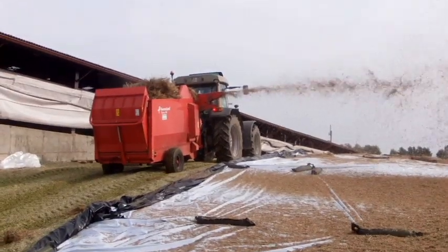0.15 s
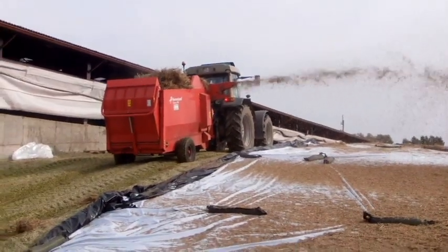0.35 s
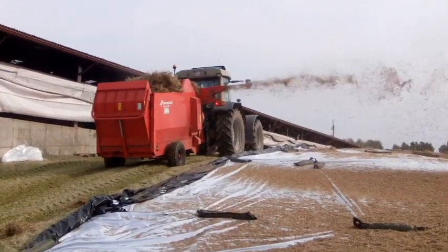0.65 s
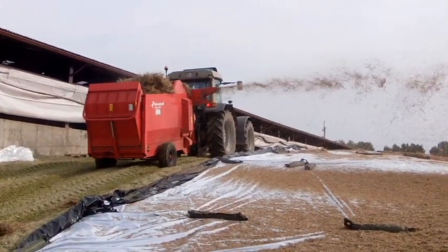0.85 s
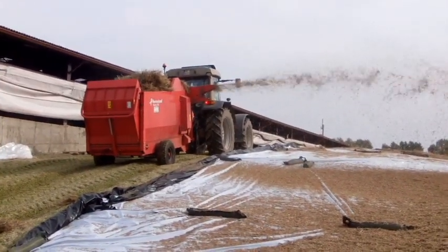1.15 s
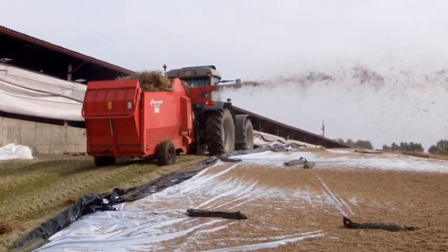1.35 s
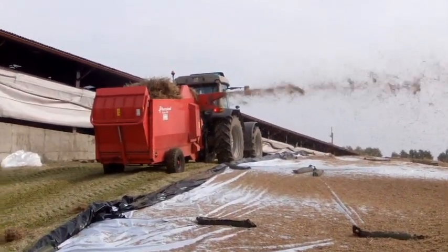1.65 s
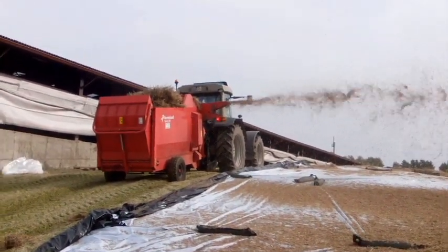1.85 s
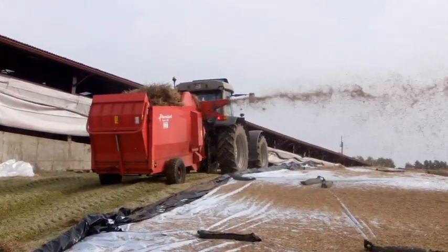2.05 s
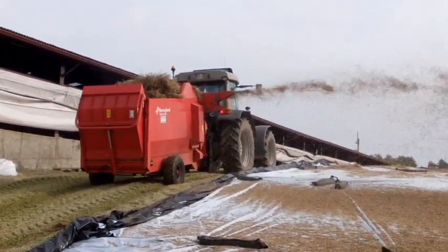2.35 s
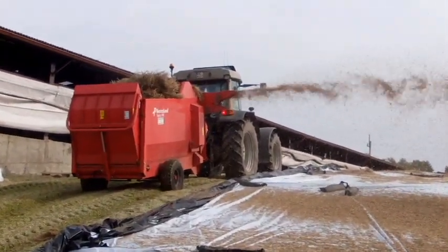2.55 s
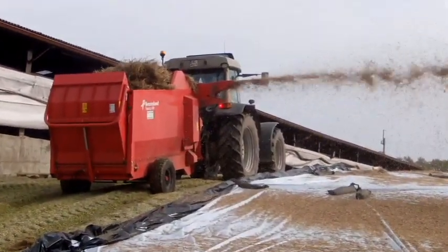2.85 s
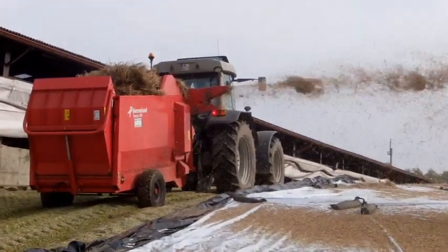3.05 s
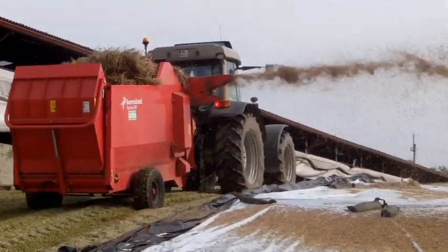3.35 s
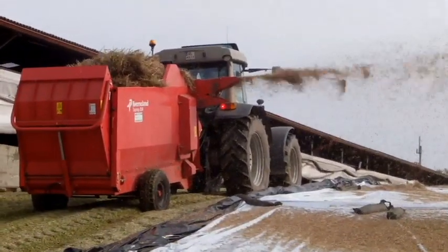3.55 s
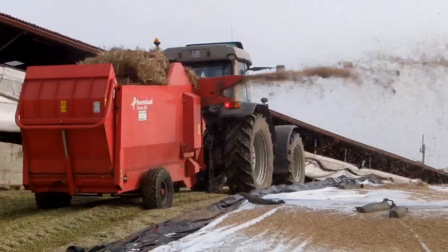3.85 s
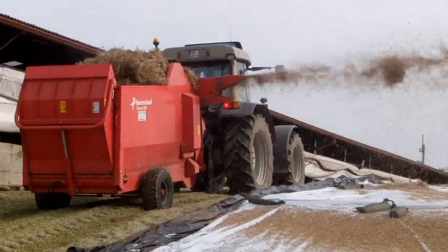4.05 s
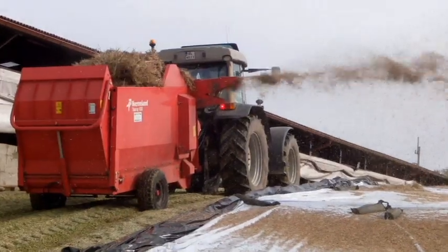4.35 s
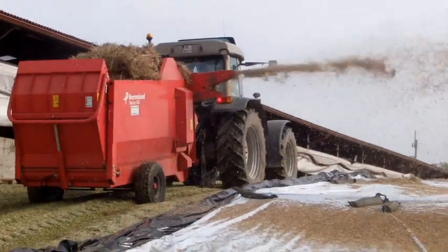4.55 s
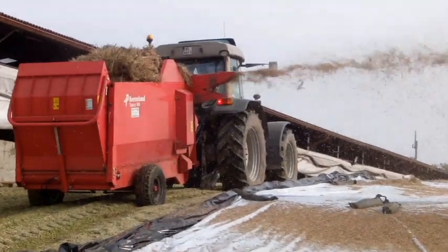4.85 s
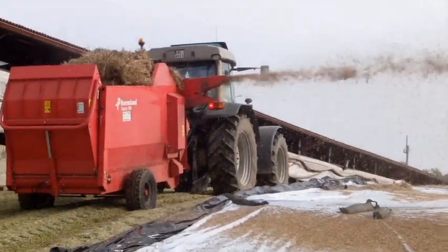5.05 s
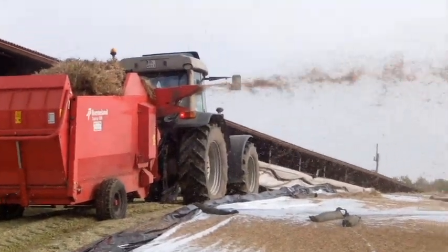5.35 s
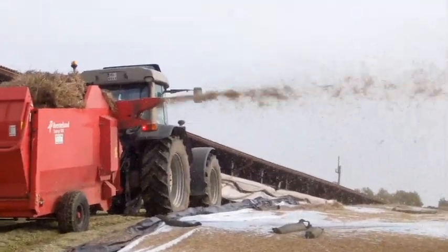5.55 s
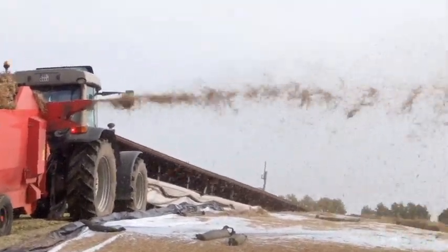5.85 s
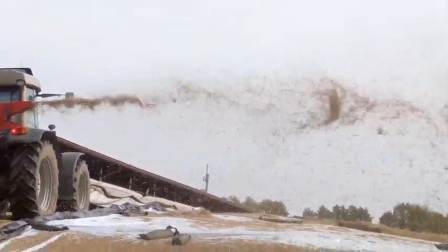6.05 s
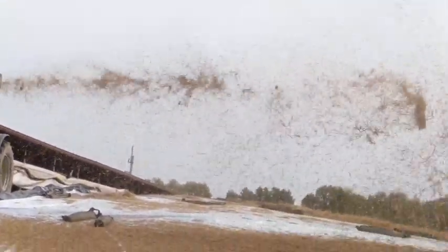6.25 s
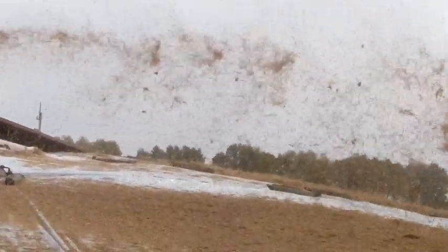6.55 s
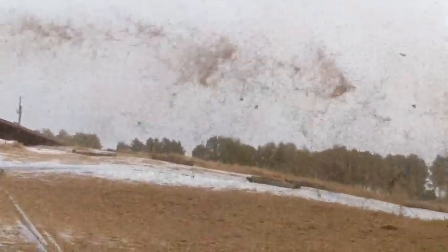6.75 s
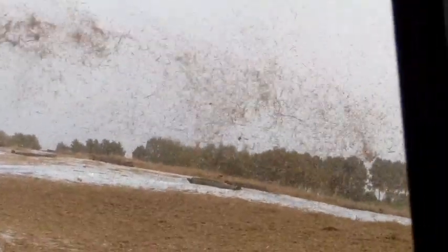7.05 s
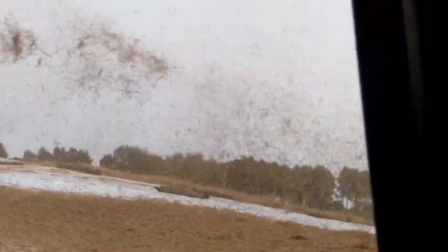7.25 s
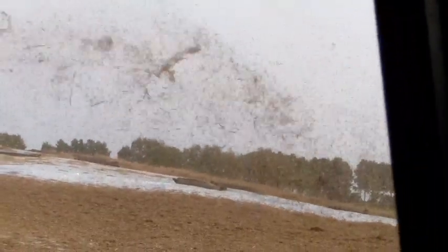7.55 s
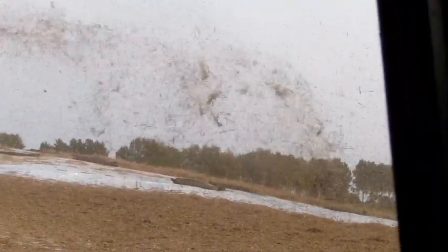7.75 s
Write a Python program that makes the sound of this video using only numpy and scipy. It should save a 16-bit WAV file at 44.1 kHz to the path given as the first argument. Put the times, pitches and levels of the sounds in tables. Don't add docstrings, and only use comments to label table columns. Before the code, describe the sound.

The noise is already at full strength and never stops: a loaded six-cylinder tractor drones low near 46 Hz, with a second engine idling beside the camera and booming unevenly against it. Over them lies a broad blower roar with boxy panel resonances and a bright, dry hiss of straw and grit rattling in a steel chute. Clumps hit as fast raspy swells with rough metallic ring, dying in under a tenth of a second: a flurry from 0.3 to 2.2 s, strong ones near 2.2 and 2.9, more around 4.0 and 5.3, then a dense cluster at 6.5-7.0. Short barn echoes thicken them. A faint turbo whistle flutters near 5 kHz. A distant loader's low revs glide, climbing at 1.6-2.4 and 6.3-7.4 s. From about 6 to 7 s the mono camera microphone turns away, slightly softening whistle, rumble and top treble; the noise continues to the end.

```python
import sys
import numpy as np
from scipy import signal
from scipy.fft import rfft, irfft, next_fast_len
from scipy.io import wavfile
from scipy.ndimage import uniform_filter1d, map_coordinates

SR = 44100
rng = np.random.default_rng(int(sys.argv[2]) if len(sys.argv) > 2 else 0)


def dump(signal):
    limited = np.clip(np.atleast_2d(signal).T, -1, 1)
    pcm = np.round(limited * 32767).astype(np.int16)
    wavfile.write(sys.argv[1], SR, pcm)


def convert_level_to_amplitude(level_db):
    exponent = np.asarray(level_db, float) / 20
    return 10 ** exponent


N = 348390
TIME = np.arange(N) / SR

# time in seconds, crank speed in rev/s, exhaust pipe tone in dB.
TRACTOR_LOAD = [(0.0, 15.61, -29.5), (0.75, 15.46, -32.5), (1.25, 15.51, -32), (2.0, 15.505, -31),
                (2.75, 15.43, -32.3), (3.5, 15.43, -35.5), (3.8, 15.375, -33.5), (4.25, 15.43, -33),
                (4.55, 15.365, -33.3), (5.1, 15.605, -31.2), (5.6, 15.61, -31.5), (6.0, 15.51, -34.2),
                (6.6, 15.595, -30.8), (7.1, 15.58, -36.5), (7.55, 15.59, -32.2), (7.9, 15.55, -32.5)]
# time in seconds, stream level in dB.
STRAW_FLOW = [(0.0, -28), (1.17, -29), (2.46, -29), (2.99, -27.5), (4.05, -29), (4.42, -27.5),
              (4.73, -28.5), (6.36, -29.5), (6.75, -27.5), (7.02, -29.5), (7.9, -30.5)]
# frequency in Hz, level in dB per Hz.
STRAW_SPECTRUM = [(1000, -11.5), (2300, -7), (3200, -3.5), (5000, -1), (6500, -4), (7500, -12),
                  (9500, -15.5), (12000, -21.5), (13500, -26.5), (17000, -37)]

NOTCH_HZ = 7867


def unit(x):
    return x / np.sqrt(np.mean(x ** 2) + 1e-20)


def curves(rows):
    seconds, *columns = np.transpose(rows)
    return [np.interp(TIME, seconds, column) for column in columns]


def sine(cycles):
    return np.sin(2 * np.pi * cycles)


def wobble(rate):
    coarse = np.arange(0, N + 32, 32)
    knots = rng.standard_normal(int(N * rate / SR) + 4)
    return np.interp(np.arange(N), coarse, map_coordinates(knots, [coarse * rate / SR]))


def filtered(x, response):
    size = next_fast_len(N + 8192)
    return irfft(rfft(x, size) * response(np.fft.rfftfreq(size, 1 / SR)), size)[:N]


def coloured(x, spectrum):
    f, db = np.transpose(spectrum)
    return unit(filtered(x, lambda hz: convert_level_to_amplitude(np.interp(np.log(hz + 1), np.log(f), db, -120, -120))))


def patchy(patchy_db):
    z = signal.stft(rng.standard_normal(N + 512), nperseg=512)[2]
    field = uniform_filter1d(rng.standard_normal(z.shape), size=7, axis=0)
    field = uniform_filter1d(field, size=8, axis=1)
    return signal.istft(z * convert_level_to_amplitude(patchy_db * unit(field)), nperseg=512)[1][:N]


def crackle(per_s, spread_db):
    at, size, sign = rng.random((3, int(per_s * N / SR)))
    ticks = np.sign(sign - .5) * convert_level_to_amplitude(spread_db * np.minimum(-np.log(size), 3))
    return unit(np.bincount((at * N).astype(int), ticks, N))


def tones(turns, orders, unsteady_db, slip):
    for order, db in orders:
        drift = slip * np.sqrt(order) * wobble(7) / (2 * np.pi)
        cycles = order * turns + rng.random() + drift
        wave = sine((cycles - np.floor(cycles)).astype(np.float32))
        level = np.sqrt(2) * convert_level_to_amplitude(db + unsteady_db * np.log(1 + order) * wobble(16))
        yield order, level * wave


def dip_or_peak(hz, centre, width):
    return 1 / (1 + (2 * (hz - centre) / width) ** 2)


def split(x):
    top = filtered(x, lambda hz: hz > NOTCH_HZ)
    return unit(x - top), unit(top)


def turned():
    return np.interp(TIME, (5.9, 7.0), [0, 1])


def loader():
    # start in seconds, end in seconds, firing from in Hz, firing to in Hz, level in dB rms.
    revs = [
        (.15, .45, 75.6, 74.6, -23),
        (1.05, 1.396, 76.97, 74.82, -20.5),
        (1.595, 2.45, 55.5, 67.1, -18.5),
        (2.802, 3.5, 72.47, 74.2, -22.5),
        (3.75, 4.198, 73.5, 74.1, -21),
        (4.651, 5.048, 74, 73.6, -23),
        (5.65, 5.9, 65.76, 61.7, -22.5),
        (6.3, 7.452, 68.2, 73.2, -20),
        (7.75, 7.948, 74.5, 76.5, -21),
    ]
    fade_s = .15
    rows = np.array(revs)
    hz = np.interp(TIME, rows[:, :2].ravel(), rows[:, 2:4].ravel())
    level = 0
    for start, end, _, _, db in revs:
        inside_s = np.minimum(TIME - start, end - TIME)
        level = level + convert_level_to_amplitude(db) * np.clip(inside_s / fade_s + 1, 0, 1)
    return np.sqrt(2) * level * convert_level_to_amplitude(1.5 * wobble(8)) * sine(np.cumsum(hz) / SR)


def idler():
    # multiple of crank speed, level in dB rms.
    engine_orders = [(1.0, -42.1), (2.0, -22.7), (3.0, -27.4), (4.0, -19.3), (5.0, -29.0), (6.0, -31.0),
                     (7.0, -41.7), (8.0, -40.0), (11.5, -34.7), (7.25, -36), (16.66, -45)]
    # multiple of crank speed, level in dB rms.
    pump_orders = [(5 / 3, -40), (7 / 3, -34), (8 / 3, -37), (10 / 3, -33), (22 / 3, -45), (46 / 3, -52)]
    rev_s = 13.265 - .0132 * TIME + 0.015 * wobble(0.95)
    boom = convert_level_to_amplitude(1.5 - 0.28 * TIME + 0.56 * wobble(2.54))
    orders = list(engine_orders) + list(pump_orders)
    parts = tones(np.cumsum(rev_s) / SR, orders, unsteady_db=1.0, slip=0.056)
    return sum(tone * (boom if order == 4 else 1) for order, tone in parts)


def turbo():
    rev_s = curves(TRACTOR_LOAD)[0]
    hz = 5080 + 450.6 * (rev_s - 15.5) + 100 * wobble(90)
    level_db = -42.5 - 7 * turned() + 3.0 * wobble(1.2) + 3.5 * wobble(60)
    return np.sqrt(2) * convert_level_to_amplitude(level_db) * sine(np.cumsum(hz) / SR)


def tractor(turns):
    # multiple of crank speed, level in dB rms.
    orders = [(1.5, -37.4), (3.0, -13.6), (6.0, -41.3), (7.5, -38.9), (9.0, -31.5), (10.5, -42.7),
              (12.0, -35.0), (15.0, -42.8), (18.0, -37.6), (21.0, -39.1), (24.0, -55.1), (27.0, -32.6),
              (30.0, -45.4), (33.0, -47.9), (36.0, -46.9), (46.0, -48.8), (65.0, -53.9), (78.0, -52.3),
              (30.66, -48), (61.31, -49), (76.66, -51), (89.25, -51)]
    pipe_db = curves(TRACTOR_LOAD)[1]
    pipe = convert_level_to_amplitude(pipe_db - pipe_db.mean())
    firing = convert_level_to_amplitude(0.63 * wobble(3.91))
    drone = 0
    for order, tone in tones(turns, orders, unsteady_db=0.35, slip=0.039):
        drone = drone + tone * (firing if order < 5 else pipe if order > 20 else 1)
    return drone


def roar(turns):
    # frequency in Hz, level in dB per Hz.
    rumble_spectrum = [(8, -40), (20, -26), (45, -8), (65, -5), (80, -4.5), (100, -19), (155, -13.5),
                       (200, -22.5), (350, -27.5), (500, -56)]
    roar_spectrum = [(150, -39), (300, -5), (500, -2), (1000, -3.5), (1500, -4), (2300, -7), (3500, -15),
                     (6000, -37)]
    stream_db, = curves(STRAW_FLOW)
    roar_db = -29.5 + 0.73 * (stream_db - stream_db.mean())
    puff = 1 + 0.045 * np.cos(2 * np.pi * 3 * turns)
    rumble_db = -24.0 - 2 * turned() + 0.69 * wobble(2.94)
    rumble = convert_level_to_amplitude(rumble_db) * coloured(rng.standard_normal(N), rumble_spectrum)
    air = coloured(patchy(patchy_db=0.45), roar_spectrum)
    return rumble + convert_level_to_amplitude(roar_db + 0.33 * wobble(5) + 0.49 * wobble(12)) * puff * air


def grit():
    # frequency in Hz, level in dB, time to fall 60 dB in seconds.
    modes = [(1682, -0.5, .06), (2039, 0, 0.096), (2835, 0, 0.055), (3245, -1, 0.054), (3800, 3.5, 0.089),
             (4160, -5, .05), (4620, -12, .04), (5410, -5, 0.033), (5620, 2.5, 0.036), (6190, -1, .04),
             (7500, -22, .03)]
    t = np.arange(SR // 10) / SR
    pings = 0
    for hz, db, t60 in modes:
        ring = unit(convert_level_to_amplitude(-60 * t / t60) * sine(hz * t))
        pings = pings + signal.oaconvolve(crackle(per_s=50, spread_db=3), ring)[:N] * convert_level_to_amplitude(db)
    return unit(pings)


def straw(turns):
    stream_db, = curves(STRAW_FLOW)
    throw = 1 + 0.017 * np.cos(2 * np.pi * turns) + 0.06 * np.cos(2 * np.pi * 3 * turns + 2.0)
    rattle = patchy(patchy_db=0.3) + 0.49 * crackle(per_s=3000, spread_db=2.5)
    low, top = split(coloured(rattle, STRAW_SPECTRUM))
    top = top + (convert_level_to_amplitude(-2.5 * turned()) - 1) * filtered(top, lambda hz: hz > 10500)
    stream = low + convert_level_to_amplitude(-14.4 + .7 * wobble(5.5)) * top + convert_level_to_amplitude(-10) * grit()
    return convert_level_to_amplitude(stream_db - 1.27 + 0.88 * wobble(8) + 0.6 * wobble(30)) * throw * stream


def clumps():
    # time in seconds, peak in dB, top end in dB, chute ring in Hz.
    wads = [(0.3207, -18, -25, 3790), (0.635, -15, -25, 5040), (0.801, -16, -16, 5450),
            (0.8602, -14, -24, 5100), (1.2965, -11, -21, 5430), (1.3748, -10.5, -26, 5080),
            (1.6826, -13, -25, 3700), (1.76, -10, -22, 5100), (1.837, -12, -27, 5080),
            (2.0238, -7.5, -24, 3800), (2.2165, -6, -22, 5400), (2.81, -10, -27, 5030),
            (2.8655, -7, -22, 3800), (3.2147, -13, -26, 5190), (3.8382, -21, -26, 5060),
            (4.0178, -8.5, -23, 5450), (4.0402, -13, -20, 5383), (4.3755, -14, -25, 5440),
            (4.969, -14, -27, 2840), (5.1981, -13, -19, 5220), (5.3058, -9, -23, 5700),
            (6.106, -10, -21, 4080), (6.553, -13, -27, 4494), (6.6179, -10, -22, 5276),
            (6.7276, -10, -25, 5860), (6.7456, -7, -20, 5650), (6.757, -15, -23, 5650),
            (6.8214, -10, -26, 4476), (7.0031, -13, -23, 4894), (7.2933, -16, -26, 5064)]
    t60_s, top_t60_s, ring_db = 0.074, 0.048, -5.5
    t = np.arange(SR // 4) / SR
    attack = 1 - np.exp(-t / 0.0029)
    swell, bright, ring = np.zeros((3, N + SR))
    rough = np.pad(wobble(500), (0, SR))
    tufts = [(when * N / SR, -17 + 4 * (size - .5), -22, np.interp(pitch, [0, 1], (4630, 5400)))
             for when, size, pitch in rng.random((24, 3))]
    for s, db, top_db, hz in list(wads) + tufts:
        at = slice(round(s * SR), round(s * SR) + len(t))
        shape = convert_level_to_amplitude(db - 11 - 60 * t / t60_s) * attack
        swell[at] += shape
        bright[at] += convert_level_to_amplitude(db + top_db - 60 * t / top_t60_s) * attack
        rough_ring = (0.37 + rough[at]) * sine(hz * t) * (t < t60_s)
        ring[at] += shape * convert_level_to_amplitude(ring_db + 20 * t / 0.14) * rough_ring
    rattle = rng.standard_normal(N) + 0.24 * crackle(per_s=3000, spread_db=6.0)
    low, top = split(coloured(rattle, STRAW_SPECTRUM))
    wad = swell[:N] * low + bright[:N] * top + ring[:N]
    return wad + convert_level_to_amplitude(-9) * np.roll(wad, round(.010 * SR)) + convert_level_to_amplitude(-12) * np.roll(wad, round(0.02 * SR))


def body(hz):
    # frequency in Hz, width in Hz, lift in dB over the roar.
    panels = [(273, 99, 4.5), (418, 32, 7), (572, 39, 4.5), (710, 38, 0.5), (770, 61, 3.5), (885, 33, 4),
              (959, 52, 6.5), (1180, 17, 2.5), (1420, 58, 3), (1810, 140, 1), (2870, 280, 2),
              (5060, 220, 1.5)]
    # frequency in Hz, width in Hz, depth from 0 to 1.
    dips = [(370, 45, 0.53), (852, 16, 0.67), (1050, 41, 0.27), (1510, 65, 0.34), (2274, 100, 0.4),
            (2630, 78, 0.15)]
    lift = 1 + sum((convert_level_to_amplitude(db) - 1) * dip_or_peak(hz, centre, width) for centre, width, db in panels)
    for centre, width, depth in dips:
        lift = lift * (1 - depth * dip_or_peak(hz, centre, width))
    return lift


def scene():
    turns = np.cumsum(curves(TRACTOR_LOAD)[0]) / SR
    machine = filtered(roar(turns) + straw(turns) + clumps(), body)
    return (loader() + idler() + turbo() + tractor(turns) + machine)[None]


def roll_off(x):
    return signal.sosfilt(signal.butter(12, 15745, fs=SR, output="sos"), x)


def record(dry):
    # frequency in Hz, level in dB per Hz.
    hiss_spectrum = [(3000, -30), (8000, -4), (17000, 5)]
    # Hz under the tone, level in dB rms.
    line_scan = [(0, -66), (60, -77), (120, -77)]
    x = dry[0] / (1 + np.abs(dry[0] / 1.2) ** 6) ** (1 / 6)
    x = x + convert_level_to_amplitude(-56) * coloured(rng.standard_normal(N), hiss_spectrum)
    x = filtered(x, lambda hz: 1 - 0.73 * dip_or_peak(hz, NOTCH_HZ, 200))
    for under_hz, db in line_scan:
        x = x + np.sqrt(2) * convert_level_to_amplitude(db) * sine((2 * NOTCH_HZ - under_hz) * TIME)
    return roll_off(x[None])


dry = scene()
out = record(dry)
dump(out)
```